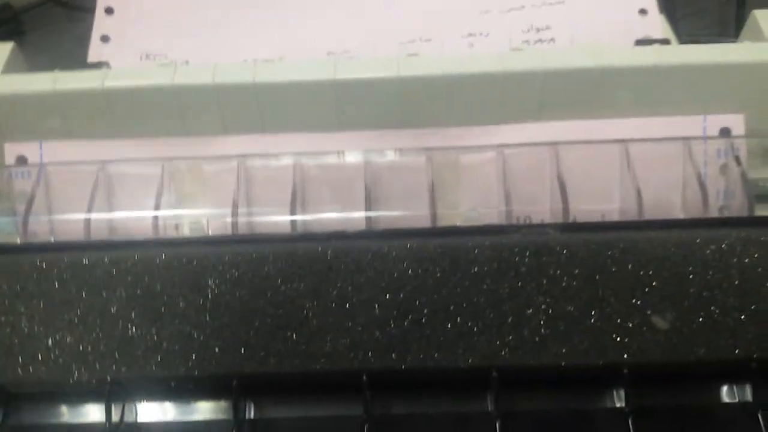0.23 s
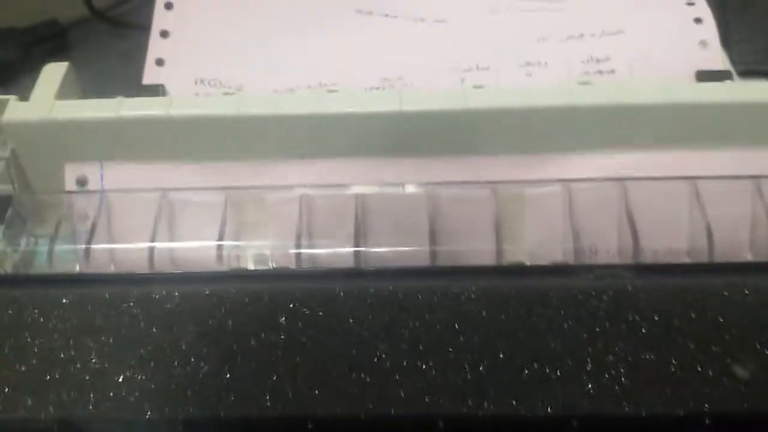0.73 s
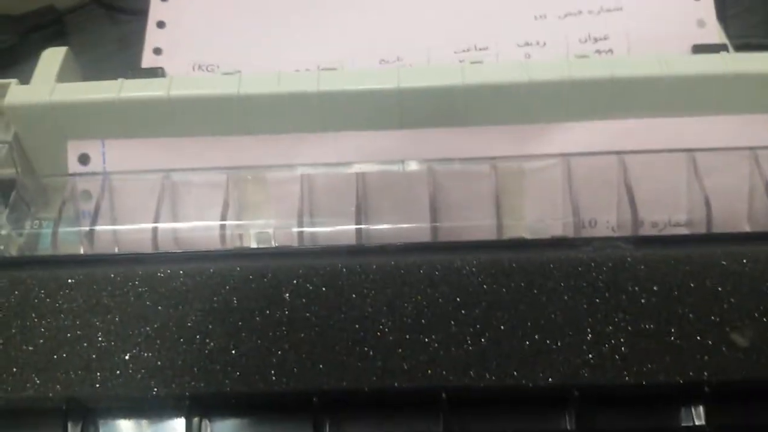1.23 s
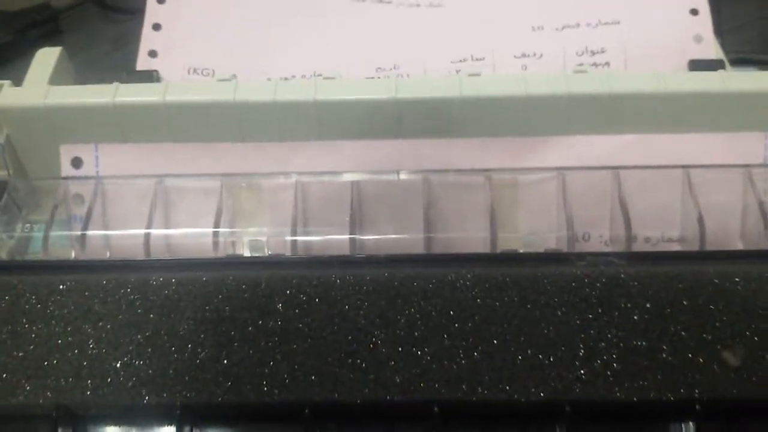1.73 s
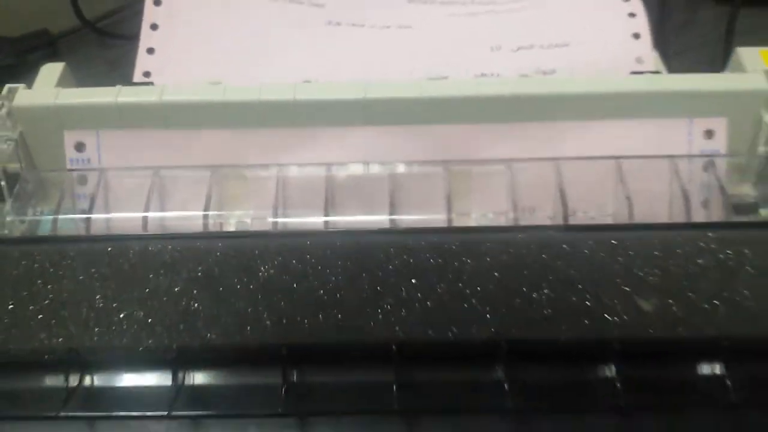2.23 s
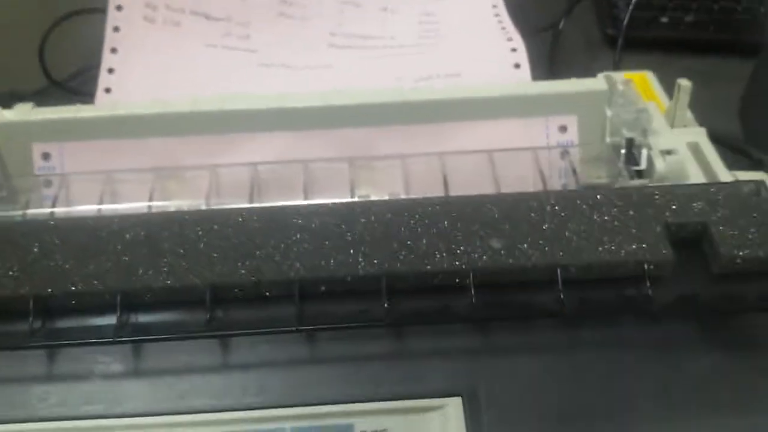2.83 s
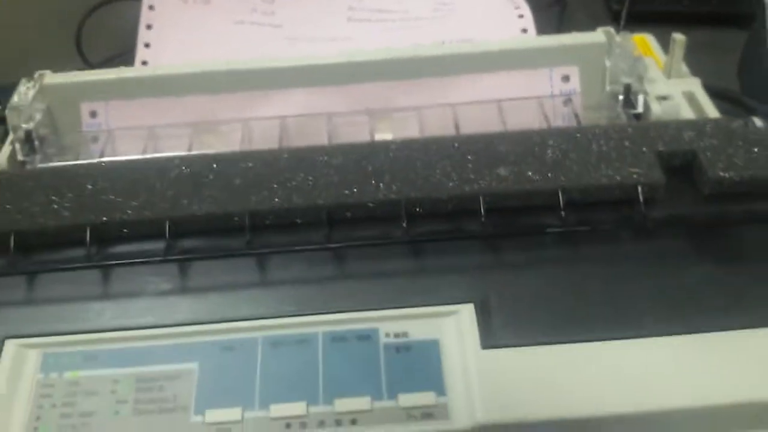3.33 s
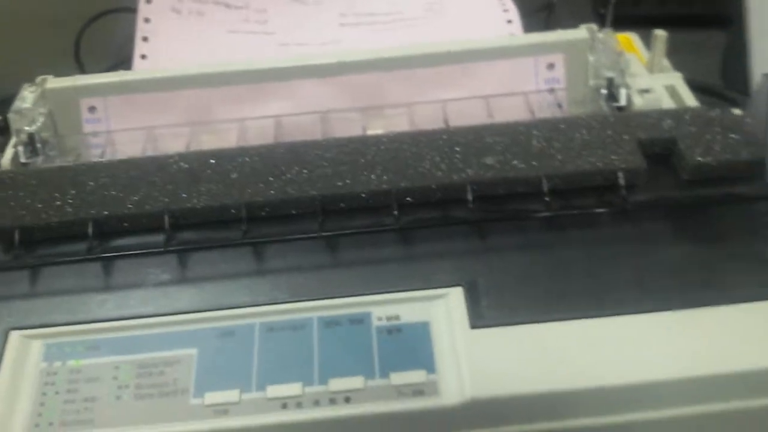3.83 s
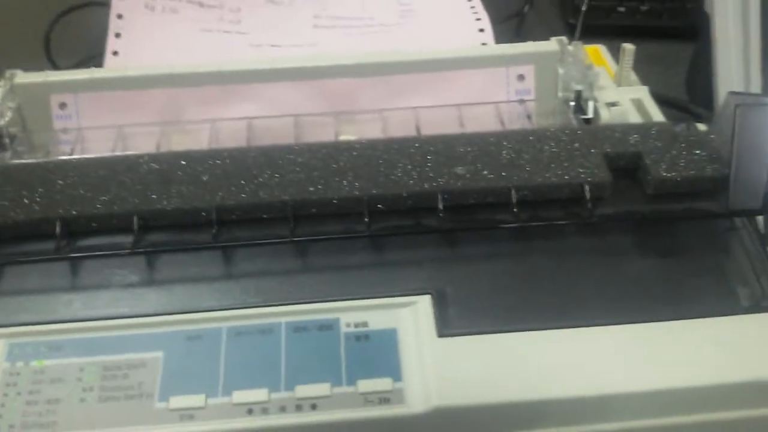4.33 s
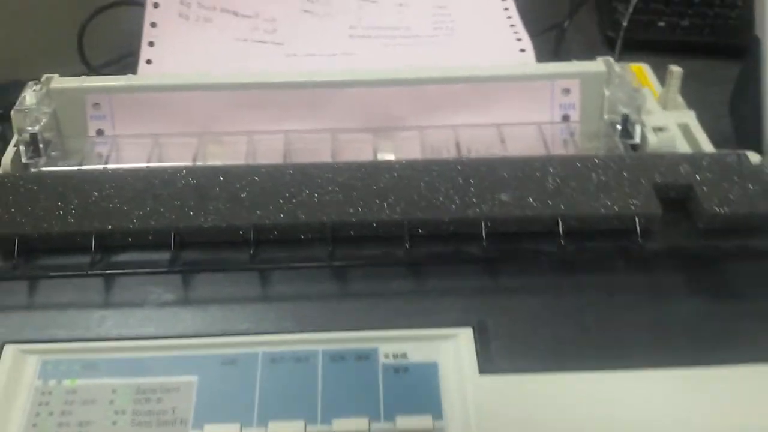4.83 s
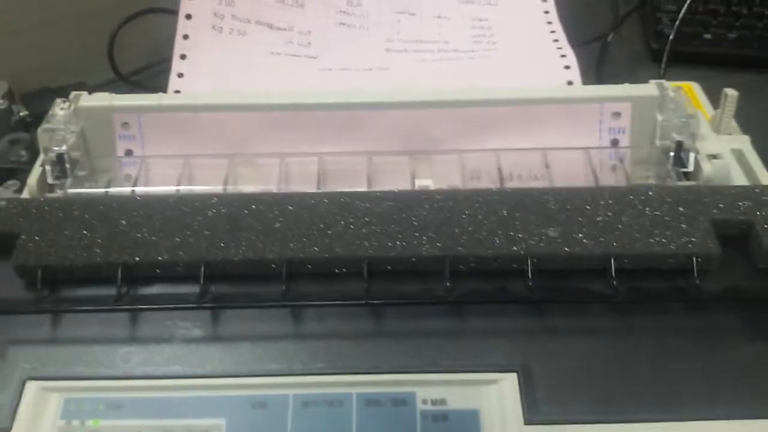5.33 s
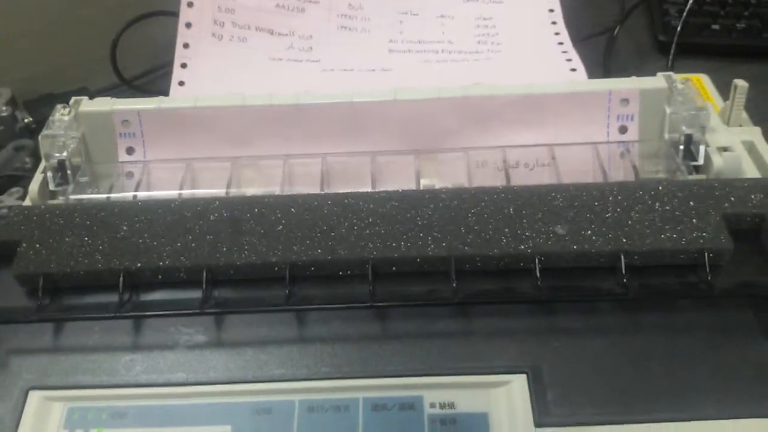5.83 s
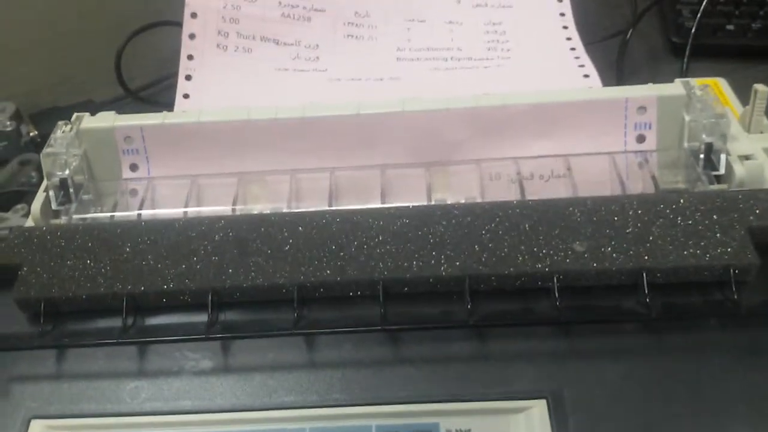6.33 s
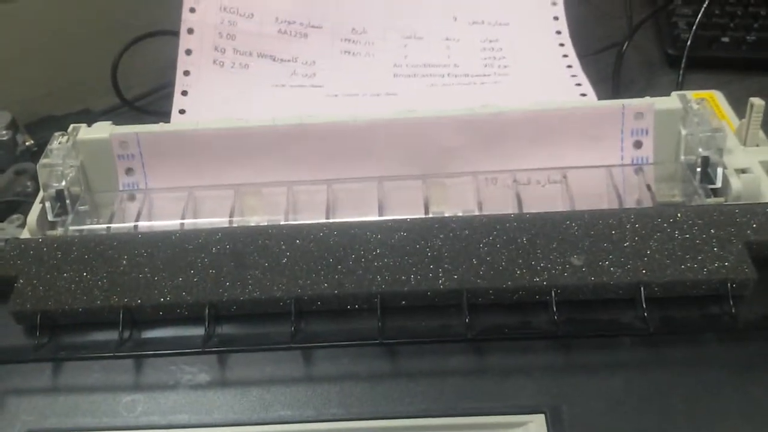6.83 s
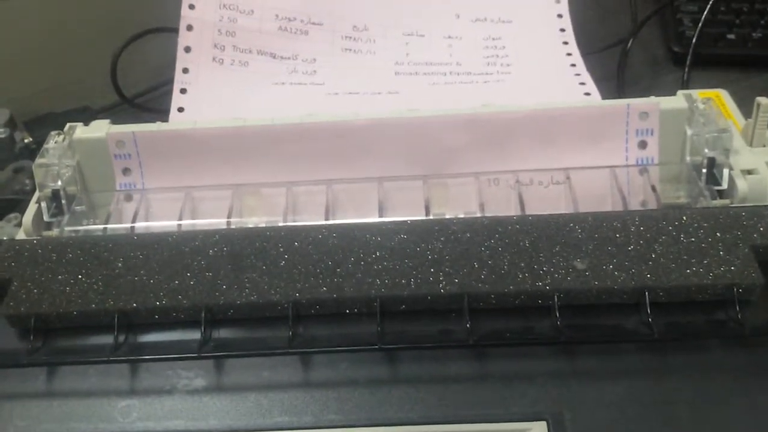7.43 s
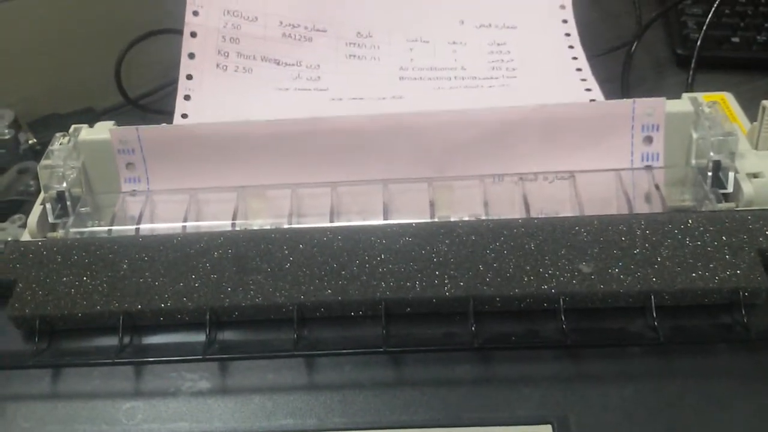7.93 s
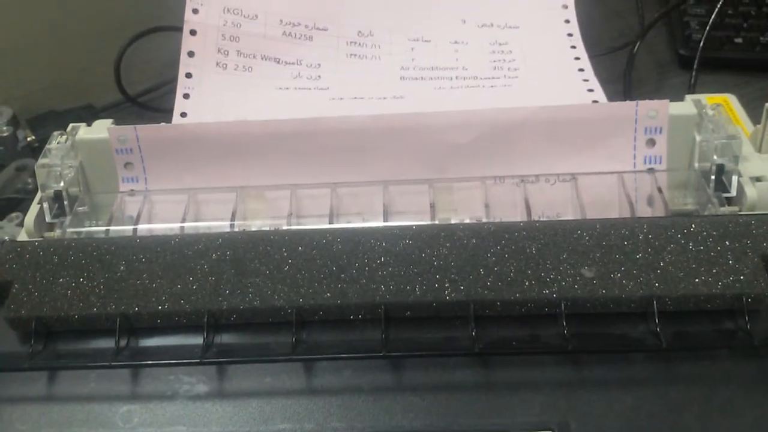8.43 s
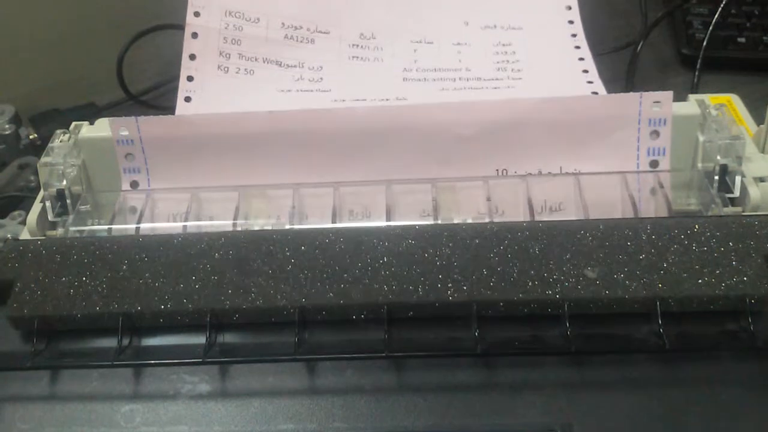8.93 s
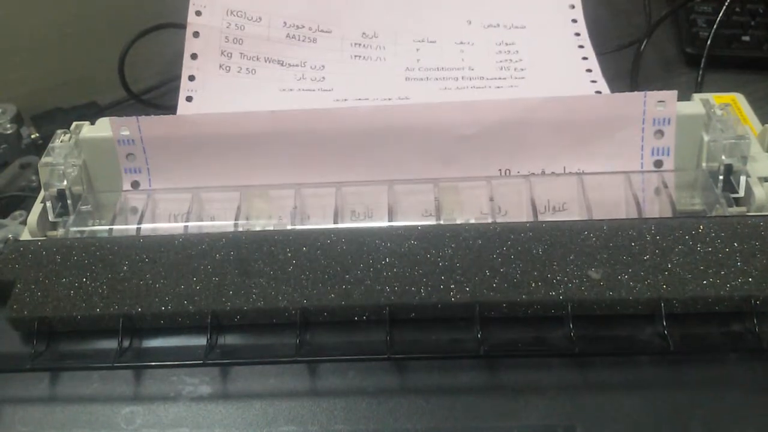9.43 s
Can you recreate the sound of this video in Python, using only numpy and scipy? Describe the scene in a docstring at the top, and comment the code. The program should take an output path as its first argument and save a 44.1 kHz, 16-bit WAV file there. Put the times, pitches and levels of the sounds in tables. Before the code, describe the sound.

A dot-matrix printer buzzes and rasps through line after line, with short pauses and a few knocks as the paper feeds.

```python
"""Dot-matrix printer in an office

Pins strike on a fixed column clock as the head crosses the paper. Letters vary the pins from column to
column and buzz; dashed rules repeat every five columns and so sound a lower pitch. Between lines the
paper feed knocks the hollow case and the paper rustles. The carriage motor hums, and the room
reverberates after each burst."""
import sys
import numpy as np
from scipy import signal
from scipy.fft import rfft, irfft, next_fast_len
from scipy.io import wavfile
from scipy.ndimage import map_coordinates

SR = 44100
rng = np.random.default_rng(int(sys.argv[2]) if len(sys.argv) > 2 else 0)


def wrap_up_sound(samples):
    """Save the sound to the file named by the first command line argument, as 16-bit audio."""
    columns = np.atleast_2d(samples).T
    # keep every value between -1 and 1, then stretch to whole-number steps
    tamed = np.clip(columns, -1, 1)
    steps = np.round(tamed * 32767).astype(np.int16)
    wavfile.write(sys.argv[1], SR, steps)


N = 426447

COLUMN_HZ, STEP_HZ, BAND_LIMIT_HZ = 1349.1, 449, 15800
ROW_GAP_COLUMNS, WORD_TINT_DB = 6, 2.2

# Levels are relative: each source applies its own gain.
# strikes in one five-column dash: position/cycle, level/dB
DASH_STRIKES = [(0, 11), (0.386, -4), (0.778, -35)]
# loudness along the dashed rules, one list each: t/s, level/dB
DASHED_RULES = [
    [(0, -15), (.04, -14.5), (.075, -20), (.11, -13.5), (.145, -14.5), (.19, -16), (.295, -21)],
    [(3.91, -13), (4.01, -15.5), (4.13, -16.5), (4.27, -15), (4.39, -17), (4.48, -19.5), (4.51, -13),
     (4.53, -19), (4.578, -18.5), (4.59, -31), (4.625, -34)],
    [(6.076, -19), (6.19, -17.5), (6.29, -19.5), (6.4, -21.5), (6.45, -19)],
    [(6.584, -18.5), (6.65, -18.5), (6.73, -21.5)],
    [(9.014, -24), (9.2, -27), (9.29, -21), (9.38, -24), (9.52, -24), (9.6, -21), (9.67, -23)],
]
# letters interrupting a rule: start/s, end/s
RULE_BREAKS = [(3.97, 4.0), (4.198, 4.212)]
# letters and words, one burst each: t/s, duration/s, level/dB
WORD_BURSTS = [(0.469, 0.018, -16), (0.497, 0.041, -16.5), (1.067, 0.019, -13), (1.093, 0.03, -16),
               (1.453, 0.045, -14), (1.5, 0.025, -16.5), (1.536, 0.026, -14.5), (1.664, 0.014, -12.5),
               (1.805, 0.01, -17), (1.936, 0.026, -17), (1.984, 0.014, -15.5), (2.517, 0.015, -14),
               (2.541, 0.036, -14.5), (2.904, 0.027, -16.5), (2.938, 0.022, -13), (2.964, 0.057, -15.5),
               (3.081, 0.044, -16.5), (3.254, 0.015, -15), (3.36, 0.081, -16.5), (3.67, 0.048, -19.5),
               (3.883, 0.026, -19), (4.704, 0.038, -14.5), (4.759, 0.062, -16), (4.823, 0.079, -14.5),
               (4.903, 0.062, -16), (4.975, 0.049, -14.5), (5.267, 0.11, -13.5), (5.552, 0.043, -14),
               (5.604, 0.046, -16.5), (5.828, 0.023, -16), (6.452, 0.034, -14), (6.49, 0.055, -19.5),
               (6.535, 0.044, -15.5), (6.728, 0.021, -15), (6.749, 0.031, -25), (6.896, 0.037, -17.5),
               (6.95, 0.016, -18.5), (6.976, 0.031, -16), (7.121, 0.011, -22.5), (7.142, 0.0087, -16.5),
               (7.155, 0.043, -24), (7.205, 0.012, -14.5), (7.463, 0.021, -14.5), (7.491, 0.069, -18),
               (7.567, 0.021, -17), (7.591, 0.095, -20.5), (7.694, 0.04, -27.5), (7.734, 0.026, -21.5),
               (7.767, 0.032, -20.5), (7.8, 0.037, -27), (7.956, 0.042, -18.5), (8.012, 0.071, -21),
               (8.096, 0.074, -23), (8.166, 0.023, -20.5), (8.19, 0.1, -22.5), (8.293, 0.03, -18.5),
               (8.569, 0.027, -19.5), (8.602, 0.069, -21.5), (8.781, 0.061, -21), (8.856, 0.024, -18.5),
               (8.876, 0.028, -26.5)]
# band shares as head and listener move: t/s, platen/dB, ribbon guide/dB, treble/dB
BAND_SHARES = [(0, -10, -12.5, -10), (.12, -11.5, -19, -10), (.2, -7, -11.5, -11), (.5, -11.5, -5, -9.5),
               (1.3, -7.5, -13.5, -8.5), (2.7, -11, -8.5, -12), (3.4, -10.5, -6.5, -9),
               (3.95, -8, -9, -11.5), (4.2, -7.5, -3.5, -17), (4.5, -9, -5.5, -7), (4.85, -9.5, -8.5, -10),
               (5.6, -12.5, -5.5, -8), (6.25, -9, -6, -10), (6.6, -14.5, -9, -7.5), (7.0, -9, -9.5, -9.5),
               (8.4, -10.5, -8.5, -7.5), (9.1, -13.5, -11.5, -5.5), (9.67, -10, -7.5, -10)]
# platen, ribbon guide, treble and remaining band: lower f/Hz, upper f/Hz, rattle level/dB
HEAD_BANDS = [(0, 3400, -2), (3400, 4800, -3), (8300, SR, 0.5), (4800, 8300, 0)]
# spectrum of one pin strike: f/Hz, density/dB
PIN_SPECTRUM = [(410, -66), (700, -34), (1350, -19.5), (1900, -23), (2750, -8), (3000, -7), (3240, -21),
                (3500, -5.5), (4100, 5.5), (4600, 1.5), (6800, 7.5), (9000, -5.5), (14300, -12),
                (15500, -53)]
# spectrum of loose parts and ribbon: f/Hz, density/dB
RATTLE_SPECTRUM = [(530, -72.5), (900, -21.5), (1330, -9), (2050, -15.5), (2660, -4.5), (3140, -10.5),
                   (6820, -1), (14300, -26), (15000, -2), (15500, -107)]
# reverberation under the cover and in the room: f/Hz, T60/s
COVER_DECAY = [(1000, 0.12), (4000, 0.048), (12000, 0.057)]
ROOM_DECAY = [(300, 0.85), (2700, 0.67), (7000, 0.74), (14000, 0.32)]
# stepping tone of the motor: t/s, fundamental/dB, octave/dB
STEP_LEVELS = [(0, -47, -60), (2.5, -53, -56.5), (5.3, -52, -57.5), (5.8, -51.5, -51.5), (9.67, -52, -52)]
# mains hum and higher step tones: f/Hz, level/dB, wavering/dB
HUM_TONES = [(48, -55, 0.5), (1820, -64.5, 4), (3590, -57, 3.5)]
# rumble of belt, fan and office: t/s, level/dB
RUMBLE_LEVELS = [(0, -47), (.56, -42.5), (1.18, -37.5), (2.3, -41.5), (3.3, -43.5), (3.61, -40.5),
                 (4.39, -43), (4.75, -38.5), (5.04, -42), (5.8, -44), (7.0, -40), (7.27, -47.5), (7.7, -38),
                 (8.37, -43.5), (9.67, -44.5)]
# its spectrum: f/Hz, density/dB
RUMBLE_SPECTRUM = [(20, -42), (40, -5), (150, 1), (400, -6.5), (800, -10.5), (1500, -13.5), (4000, -14.5),
                   (9000, -21), (15000, -42)]
# upright lines, struck by two rows of pins: t/s, level/dB, second row re first/dB
UPRIGHT_LINES = [(0.053, -2, -1), (0.08, -5, 1), (0.145, -4.5, 0.5), (0.293, -8, 0.5), (0.442, -9.5, 1),
                 (0.5728, -9, -3), (1.0527, -10, 0), (1.194, -7.5, 0.5), (1.424, -5, -1.5),
                 (1.595, -4, -5.5), (1.647, -9, 0.5), (1.7431, -5.5, 0.5), (1.891, -10, 2.5),
                 (2.0216, -8, 2), (2.503, -10, 0), (2.8743, -7, 1.5), (3.472, -11.5, 3.5),
                 (3.6023, -10.5, -1), (3.655, -15, 2), (4.6962, -11, -3), (5.066, -12.5, 6.5),
                 (5.664, -10, 0)]
# knocks of the paper feed: t/s, thud/dB, click re thud/dB
FEED_KNOCKS = [(0.65, -16, -0.5), (0.811, -23.5, -25), (0.823, -17, -1), (0.857, -15, -3.5),
               (0.989, -20.5, -16), (1.002, -20.5, 3), (2.1, -16.5, 0), (2.261, -22, -10), (2.272, -18, 0),
               (2.311, -16, -3.5), (2.446, -18, -11), (2.451, -22.5, 2)]
# the carriage brakes and turns: t/s, level/dB
CARRIAGE_TURNS = [(3.482, -25), (3.529, -31), (4.598, -26), (4.8, -20.5), (5.576, -32), (5.678, -21.5),
                  (6.775, -22), (6.789, -41), (6.814, -36), (7.14, -26.5), (7.791, -29), (7.837, -29),
                  (8.897, -24.5), (8.92, -25.5)]
# modes of the plastic case: f/Hz, bandwidth/Hz, level/dB
CASE_MODES = [(239, 91, -0.5), (407, 43, 5.5), (480, 14, 7), (660, 75, 4), (880.5, 21, 3.5),
              (1090, 106, -4), (1840, 360, -7.5), (2500, 430, -13.5)]
# spectrum of a feed click: f/Hz, density/dB
CLICK_SPECTRUM = [(800, 4), (2500, 14), (6000, 12), (14000, -19)]
# sliding paper, one list per slide: t/s, level/dB
PAPER_SLIDES = [
    [(0.68, -38.5), (0.824, -36), (1.0, -47)],
    [(1.2, -54), (1.42, -46)],
    [(2.13, -40), (2.302, -39), (2.44, -42.5)],
]
# its spectrum: f/Hz, density/dB
PAPER_SPECTRUM = [(880, -44), (1500, -9), (3710, -15), (3930, -10), (6430, -1), (7940, -8.5), (14000, -23),
                  (15000, -26)]
# the carriage motor at low speed: t/s, duration/s, f/Hz, level/dB
MOTOR_GROANS = [(1.156, 0.091, 270, -46), (1.2, 0.12, 150, -47), (1.718, 0.22, 223, -45),
                (2.432, 0.095, 271, -41.5), (3.504, 0.076, 270, -43), (4.642, .08, 276, -43),
                (5.692, 0.088, 271, -49.5), (6.816, 0.075, 268, -42), (7.85, .08, 274, -50.5),
                (8.96, 0.062, 272, -43)]
# treble roll-off of the microphone: f/Hz, gain/dB
MIC_RESPONSE = [(14550, 0), (14800, -34), (15800, -38)]


def amp(db):
    """Amplitude ratio of a level in decibels."""
    return 10 ** (np.asarray(db) / 20)


def unit(x):
    """Normalisation to an rms of 1."""
    return x / np.sqrt(np.mean(x ** 2) + 1e-20)


def along(points, hz):
    """Interpolation of (f/Hz, value) points on a logarithmic frequency axis."""
    f, values = np.transpose(points)
    return np.interp(np.log(hz + 1), np.log(f + 1), values)


def curves(rows):
    """Linear interpolation in time of each level column; silent outside the rows."""
    times, *columns = np.transpose(rows)
    return [np.interp(np.arange(N) / SR, times, db, left=-120, right=-120) for db in columns]


def wobble(rate):
    """Smooth random modulation: a spline with rate knots per second."""
    return map_coordinates(rng.standard_normal(int(N * rate / SR) + 4), [np.arange(N) * rate / SR])


def filtered(x, response):
    """Linear filtering: the spectrum of x is multiplied by response(f)."""
    size = next_fast_len(N + SR // 2)
    return irfft(rfft(x, size) * response(np.fft.rfftfreq(size, 1 / SR)), size)[..., :N]


def minimum_phase(spectrum, hz):
    """Causal response of a given magnitude, by folding the cepstrum."""
    cepstrum = irfft(np.log(amp(along(spectrum, hz)) + 1e-6))
    half = len(cepstrum) // 2
    cepstrum[1:half] *= 2
    cepstrum[half + 1:] = 0
    return np.exp(rfft(cepstrum))


def noise(spectrum):
    """Spectral shaping of white noise, to an rms of 1."""
    return unit(filtered(rng.standard_normal(N), lambda hz: amp(along(spectrum, hz))))


def pulses(times, sizes):
    """Band-limited impulses: a windowed sinc places each between samples."""
    at = times[:, None] * SR
    taps = np.floor(at) + np.arange(-7, 9)
    kernel = np.sinc(taps - at) * np.cos(np.pi * (taps - at) / 16) ** 2
    indices = np.clip(taps, 0, N).astype(int)
    return np.bincount(indices.ravel(), (kernel * sizes[:, None]).ravel(), N + 1)[:N]


def reverberation(x, hop, seconds, t60):
    """Diffuse field: each overlapping piece of x is convolved with its own decaying noise."""
    starts = np.arange(0, N + hop, hop)
    pieces = np.pad(x, (hop, 2 * hop))[starts[:, None] + np.arange(2 * hop)] * np.hanning(2 * hop)
    hz, t, spectra = signal.stft(rng.standard_normal((len(starts), int(seconds * SR))), SR, nperseg=128)
    tails = signal.istft(spectra * amp(-60 * t / along(t60, hz)[:, None]), SR, nperseg=128)[1]
    tails /= np.linalg.norm(tails, axis=1, keepdims=True)
    wet = signal.fftconvolve(pieces, tails, axes=1)
    indices = starts[:, None] + np.arange(wet.shape[1])
    return np.bincount(indices.ravel(), wet.ravel())[hop:hop + N]


def pin_strikes(rule_share):
    """Periodic impacts give pitch: letters strike every column, a rule repeats every fifth."""
    columns = np.arange(int(N / SR * COLUMN_HZ)) / COLUMN_HZ
    at = (columns * SR).astype(int)
    # how many pins fire, and how late they land, varies with the letter
    force = np.abs(1 + .55 * wobble(220)[at] + .2 * rng.standard_normal(len(columns)))
    lag = 2.5e-5 * wobble(45)[at] + rng.normal(0, 1e-5, len(columns))
    letters = unit(pulses(columns + lag, force))
    dashes, rule = columns[::5], np.zeros(N)
    for position, db in DASH_STRIKES:
        times = dashes + 5 * position / COLUMN_HZ + rng.normal(0, 6e-6, len(dashes))
        rule += pulses(times, amp(db + rng.normal(0, 1, len(dashes))))
    return np.sqrt(rule_share) * unit(rule) + np.sqrt(1 - rule_share) * letters


def band_gains():
    """Partition of power: words and rules set the level, and four bands take drifting shares."""
    level = sum(amp(curves(rows)[0]) for rows in DASHED_RULES)
    tint_db = np.zeros((3, N))
    for start, length, db in WORD_BURSTS:
        span = slice(round(start * SR), round((start + length) * SR))
        level[span] = amp(db)
        tint_db[:, span] = rng.normal(0, WORD_TINT_DB, (3, 1))
    shares = amp(np.array(curves(BAND_SHARES)) + tint_db)
    remainder = np.sqrt(np.maximum(1 - np.sum(shares ** 2, axis=0), .02))
    return level * np.vstack([shares, remainder])


def bending_waves(strikes):
    """Dispersion: each band arrives with its own group delay, up to about 3.5 ms."""
    grid_hz = np.linspace(0, SR / 2, 100)
    lag_cycles = np.cumsum(rng.uniform(0, .0035, 100)) * SR / 200
    return filtered(strikes, lambda hz: np.exp(-2j * np.pi * np.interp(hz, grid_hz, lag_cycles)))


def print_head():
    """Impact excitation: the pins ring head, platen and cover, and loose parts rattle."""
    rule_share = np.zeros(N)
    for (start, _), *_, (end, _) in DASHED_RULES:
        rule_share[round(start * SR):round(end * SR)] = .985
    for start, end in RULE_BREAKS:
        rule_share[round(start * SR):round(end * SR)] = 0
    strikes, gains = pin_strikes(rule_share), band_gains()
    strikes = bending_waves(strikes)
    rattle_db = -2 - 9.9 * rule_share + 1.2 * (1 - rule_share) * wobble(200)
    rattle = amp(rattle_db) * rng.standard_normal(N)
    sound = pin_volleys()
    for gain, (low_hz, high_hz, db) in zip(gains, HEAD_BANDS):
        for drive, spectrum in ((strikes, PIN_SPECTRUM), (amp(db) * rattle, RATTLE_SPECTRUM)):
            band = lambda hz: minimum_phase(spectrum, hz) * (hz > low_hz) * (hz <= high_hz)
            power = np.mean(np.abs(band(np.linspace(0, SR / 2, 4097))) ** 2)
            sound += filtered(drive * gain, band) / np.sqrt(power)
    cover = reverberation(sound, hop=3300, seconds=.06, t60=COVER_DECAY)
    return amp(-6) * sound + amp(-5) * cover


def motor_hum():
    """Forced vibration: motor steps and mains give tones that waver in level and phase."""
    step_db, octave_db = curves(STEP_LEVELS)
    t = np.arange(N) / SR
    phase = 2 * np.pi * STEP_HZ * t + .35 * wobble(15)
    tones = amp(step_db + 2 + 4.2 * wobble(25)) * np.sin(phase)
    tones += amp(octave_db + 3 + 3 * wobble(12)) * np.sin(2 * phase)
    for hz, db, waver_db in HUM_TONES:
        level = amp(db + 2.5 + waver_db * wobble(6.7))
        tones += level * np.sin(2 * np.pi * hz * t + .66 * wobble(7.7))
    return tones


def rumble():
    """Amplitude-modulated noise: belt, fan and office make a low, unsteady bed."""
    level_db = curves(RUMBLE_LEVELS)[0] + 1.2 * wobble(14) + 2.7 * wobble(4)
    return amp(level_db) * noise(RUMBLE_SPECTRUM)


def pin_volleys():
    """Superposed impacts: a whole row of pins lands raggedly on an upright line, then the other row."""
    t, volleys = np.arange(SR // 100) / SR, np.zeros(N)
    for start, db, second_db in UPRIGHT_LINES:
        for delay, row_db in ((0, db), (ROW_GAP_COLUMNS / COLUMN_HZ, db + second_db)):
            volley = amp(row_db - 60 * t / .008) * rng.standard_normal(len(t))
            volleys[round((start + delay) * SR):][:len(t)] += volley
    return amp(8) * filtered(volleys, lambda hz: minimum_phase(RATTLE_SPECTRUM, hz))


def add_impact(track, start, db, rise_s, t60_s):
    """Damped excitation: adds a noise burst that rises and decays exponentially."""
    t = np.arange(int(.12 * SR)) / SR
    envelope = amp(db - 60 * t / t60_s) * (1 - np.exp(-t / rise_s))
    track[round(start * SR):][:len(t)] += envelope * rng.standard_normal(len(t))


def case_response(hz):
    """Modal superposition: damped resonances of the hollow case, alternating in sign."""
    return sum((-1) ** k * amp(db) * 1j * hz * width / (mode_hz ** 2 - hz ** 2 + 1j * hz * width)
               for k, (mode_hz, width, db) in enumerate(CASE_MODES))


def case_knocks():
    """Resonance: feed gears and turning carriage knock the case; a click leads each feed knock."""
    thuds, clicks = np.zeros((2, N + SR))
    for start, db, click_db in FEED_KNOCKS:
        add_impact(thuds, start, db, rise_s=.0042, t60_s=.084)
        add_impact(clicks, start - .003, db + click_db, rise_s=.0088, t60_s=.034)
    for start, db in CARRIAGE_TURNS:
        add_impact(thuds, start, db - 8, rise_s=.012, t60_s=.2)
    ticks = filtered(clicks[:N], lambda hz: minimum_phase(CLICK_SPECTRUM, hz))
    return amp(15) * filtered(thuds[:N], case_response) + amp(1.5) * ticks


def paper_rustle():
    """Sliding friction: moving paper radiates broadband noise of flickering level."""
    level = sum(amp(curves(rows)[0]) for rows in PAPER_SLIDES)
    return level * amp(1.5 * wobble(90)) * noise(PAPER_SPECTRUM)


def motor_groans():
    """Forced vibration at low speed: the carriage motor gives short low tones that swell and fade."""
    t, groans = np.arange(N) / SR, np.zeros(N)
    for start, length, hz, db in MOTOR_GROANS:
        swell = np.sin(np.pi * np.clip((t - start) / length, 0, 1))
        groans += amp(db + 6) * swell * np.sin(2 * np.pi * hz * t)
    return groans


def scene():
    """Superposition of direct and reverberant sound, almost alike in both channels."""
    direct = print_head() + case_knocks() + paper_rustle()
    room = amp(-13.5) * reverberation(direct, hop=3300, seconds=.6, t60=ROOM_DECAY)
    mid = direct + room + motor_hum() + rumble() + motor_groans()
    side = amp(-56.5) * reverberation(mid, hop=11000, seconds=.02, t60=[(1000, .0056)])
    return np.array([mid + side, mid - side])


def record(dry):
    """Saturation and band limiting: a nearby microphone rounds the peaks and fades above 14.5 kHz."""
    soft = dry / (1 + np.abs(dry / 0.88) ** 4) ** (1 / 4)
    return filtered(soft, lambda hz: amp(along(MIC_RESPONSE, hz)) * (hz < BAND_LIMIT_HZ))


dry = scene()
out = record(dry)
wrap_up_sound(out)
```